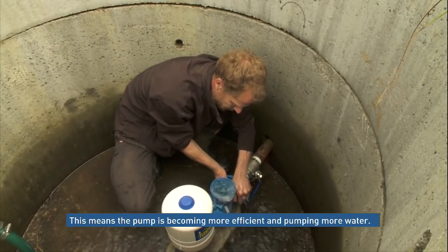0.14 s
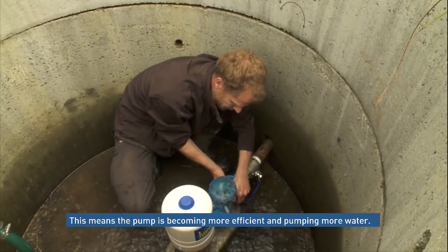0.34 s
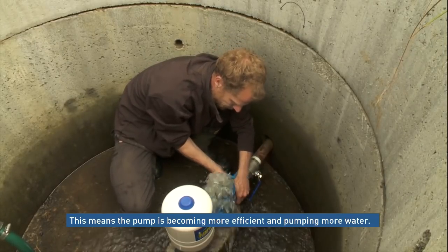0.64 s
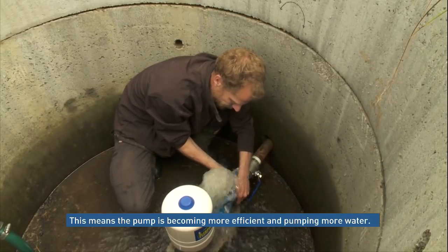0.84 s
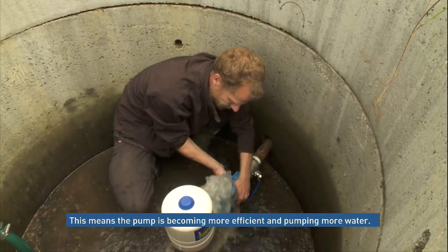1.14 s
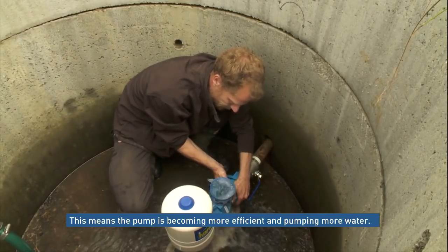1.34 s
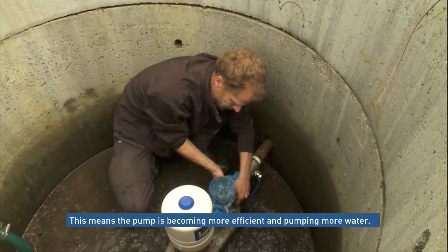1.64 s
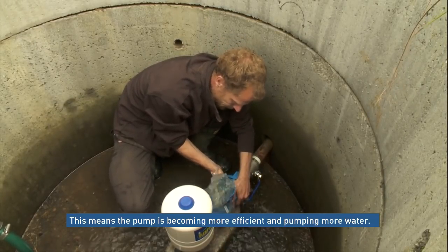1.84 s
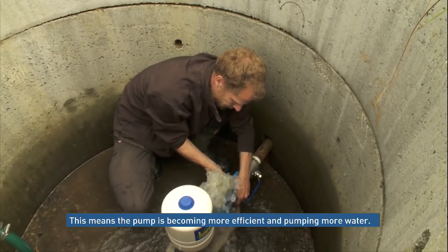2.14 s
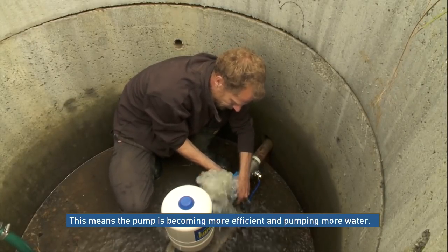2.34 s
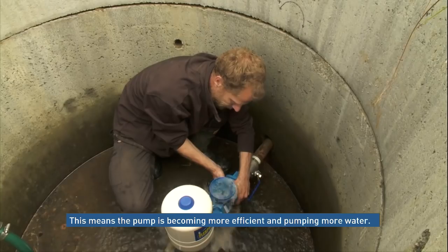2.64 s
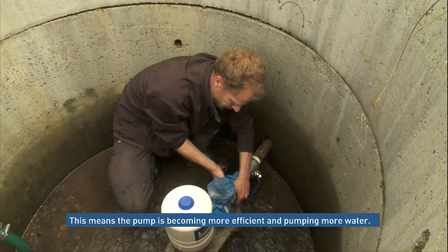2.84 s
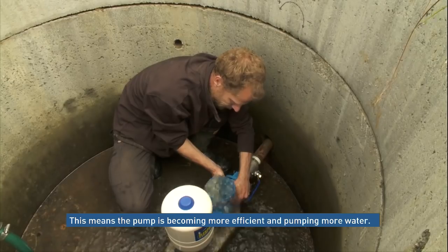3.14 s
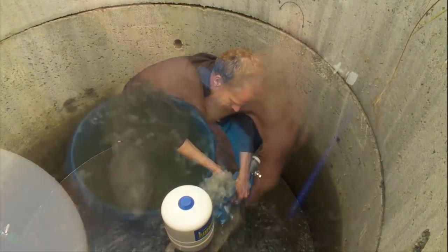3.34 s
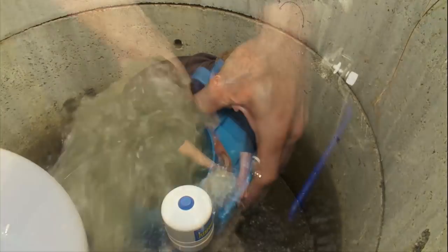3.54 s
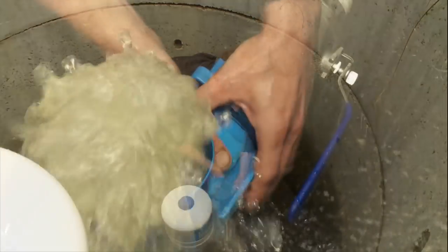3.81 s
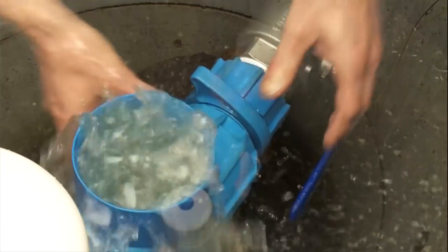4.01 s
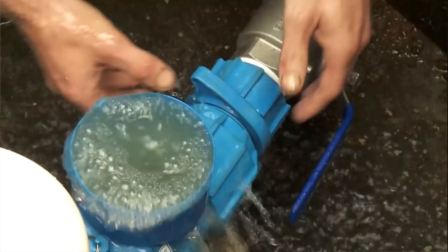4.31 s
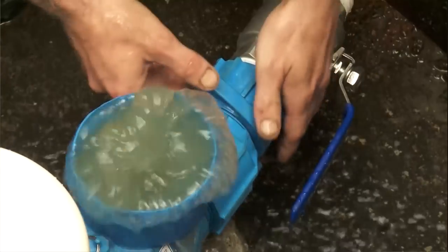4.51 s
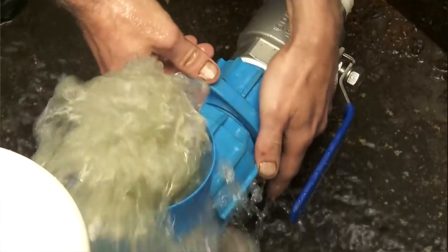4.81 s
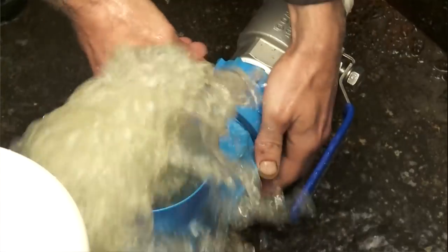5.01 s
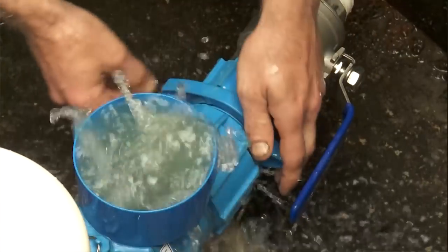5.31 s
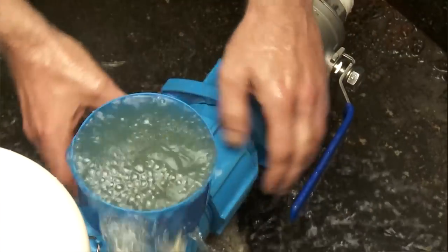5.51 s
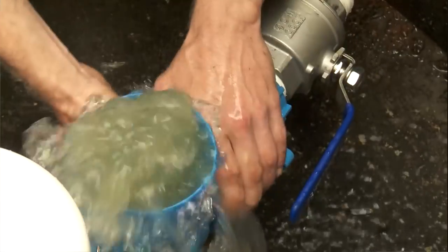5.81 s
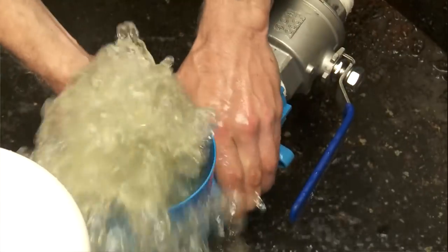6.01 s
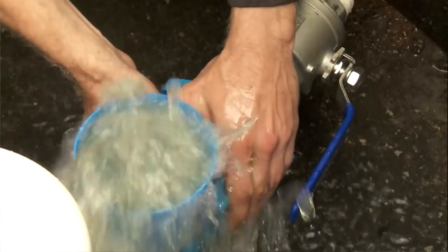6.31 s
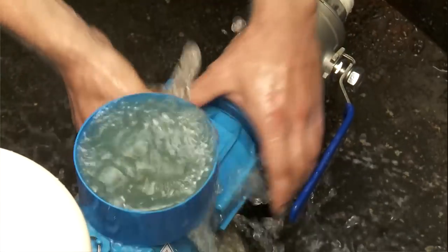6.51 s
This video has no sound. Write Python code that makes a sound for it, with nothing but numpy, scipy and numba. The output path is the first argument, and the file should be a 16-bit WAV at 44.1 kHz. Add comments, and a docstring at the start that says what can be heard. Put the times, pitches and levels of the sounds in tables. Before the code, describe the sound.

Close in a round concrete pit, a water pump beats every 1.3 seconds. Water gushes from its valve, swelling until the valve slams with a hard, hollow knock and short metallic ring. The flow stops abruptly; thrown water splashes back on the wet floor, glugs and drains to drips before the next gush. Single bubbles plop throughout, with a faint hiss beneath.

```python
"""Hydraulic ram pump in a pit

A hydraulic ram pump beats at the bottom of a round concrete pit, once every 1.3 s. Water, built from
clouds of ringing bubbles and filtered noise, gushes ever harder from the waste valve until it slams shut
with a knock: a pressure pulse, its echoes and ringing modes. The thrown water falls back on the wet floor,
gurgles and drains. A low rumble of filtered noise comes and goes for a while; a faint hiss lies under all."""
import sys
import numpy as np
from scipy import signal
from scipy.fft import rfft, irfft, next_fast_len
from scipy.io import wavfile
from numba import njit

SR = 44100
rng = np.random.default_rng(int(sys.argv[2]) if len(sys.argv) > 2 else 0)


def generate_wav(sig):
    """Save sig (samples, or channels by samples) to the path in sys.argv[1] as 16-bit PCM at SR."""
    pcm = np.round(np.clip(np.atleast_2d(sig).T, -1, 1) * 32767).astype(np.int16)
    wavfile.write(sys.argv[1], SR, pcm)


N = 293302
TIME = np.arange(N) / SR   # seconds

# The valve slams. Each row: time in seconds, thud level in dB, relative crack level in dB.
KNOCKS = [(1.1510, -7.5, -22), (2.4596, -4.5, -21.5), (3.7695, -6, -22.5), (5.0744, -6.5, -20.5),
          (6.3786, -6, -22.5)]
# Large single bubbles. Each row: time in seconds, height before the envelope in dB, nominal pitch in Hz,
# ring in cycles.
PLOPS = [(0.052, -17.5, 454, 12), (0.178, -19, 730, 31), (0.354, -18, 1260, 38), (0.808, -14.5, 806, 30),
         (0.81, -15, 1030, 27), (0.845, -17, 659, 41), (0.932, -22, 514, 38), (1.216, -19, 1170, 49),
         (1.430, -20, 484, 26), (1.681, -13, 1620, 47), (2.046, -24.5, 677, 13), (2.275, -16.5, 641, 34),
         (2.801, -12.5, 767, 23), (3.375, -22.5, 830, 23), (3.415, -21, 810, 58), (3.485, -20, 520, 25),
         (3.557, -10.5, 1240, 22), (3.558, -16, 567, 27), (3.836, -19, 1030, 33), (4.012, -24.5, 514, 32),
         (4.457, -33, 2000, 36), (4.655, -21.5, 877, 40), (4.678, -17.5, 1274, 25), (4.731, -21, 1726, 47),
         (4.93, -11.5, 1760, 55), (5.21, -18.5, 392, 37), (5.540, -12.5, 785, 35), (5.593, -20, 1670, 40),
         (5.719, -23, 1500, 50), (5.882, -26, 1930, 41), (6.079, -17, 1067, 75), (6.122, -9, 737, 42),
         (6.168, -10, 1680, 30), (6.488, -21.5, 407, 20)]
# Lumps of water slap down. Each row: time in seconds, rms level at the top in dB, centre in Hz,
# width in octaves, fall time in seconds.
SLAPS = [(0.124, -24, 1480, 1.3, 0.01), (0.240, -25, 4200, 1.6, 0.031), (0.281, -28, 4520, 2.5, .011),
         (0.41, -25, 6300, 2.1, 0.01), (0.445, -30.5, 2960, 0.78, 0.0062), (0.518, -38, 3000, 3.6, 0.015),
         (0.688, -34.5, 1840, 0.64, 0.024), (0.886, -18, 2500, 0.7, 0.0092),
         (1.134, -22, 2500, 1.5, 0.0082), (1.465, -24, 3280, 3, 0.01), (1.660, -26.5, 4200, 1.8, 0.0089),
         (1.6814, -26.5, 2320, 0.97, 0.0091), (1.967, -36, 3420, 2.8, 0.023),
         (2.121, -28.5, 2460, 0.46, 0.01), (2.250, -27.5, 5800, 2.1, 0.011), (2.288, -24, 5000, 1, .01),
         (2.41, -25, 1390, 0.45, 0.0054), (2.745, -28.5, 2680, 2.1, 0.04), (2.824, -25, 3080, 3.3, 0.016),
         (3.02, -30, 4440, 2.5, 0.012), (3.069, -36, 1660, 1.8, 0.012), (3.165, -37, 4500, 2.1, 0.016),
         (3.268, -43, 3500, 2.4, 0.035), (3.308, -32.5, 2500, 0.32, 0.0051),
         (3.585, -25, 2460, 0.58, 0.0096), (3.693, -21, 2340, 1.4, 0.011), (3.947, -25.5, 2150, 3.5, 0.011),
         (4.047, -25, 2190, 3, 0.013), (4.0997, -24.5, 3300, 2.7, 0.0095), (4.139, -28, 1520, 0.7, 0.0093),
         (5.052, -18.5, 2550, 2.6, .011), (5.387, -25, 2420, 1.05, 0.011), (5.632, -39, 3780, 3.2, 0.035),
         (5.827, -35, 3500, 2.4, 0.0091), (5.996, -32.5, 4500, 2, .012), (6.079, -28.5, 1990, 0.73, 0.01),
         (6.17, -20.5, 2160, 0.53, 0.0095), (6.251, -25, 4470, 1.9, 0.017),
         (6.344, -23.5, 1730, 1.1, 0.0097), (6.538, -24, 3070, 2, 0.027)]
# Single hard drops tick on the pump body. Each row: time in seconds, rms level at the top in dB.
TICKS = [(0.295, -24), (0.811, -19.5), (1.431, -20.5), (1.600, -28), (1.683, -21), (2.994, -25),
         (3.453, -23), (4.39, -29), (4.78, -19.5), (4.980, -21)]
# Colour of the water. Each row: frequency in Hz, relative spectral level in dB.
WATER_COLOUR = [(120, -46), (200, -18), (340, -22), (490, 3), (537, -14.5), (732, -0.5), (912, -4.5),
                (1470, 0), (2450, -1), (3730, -11), (6110, -8.5), (7470, -12.5), (9300, -12),
                (15000, -23.5), (15800, -17)]
# Wall and floor throw the knock back. Each row: delay in seconds, signed gain.
ECHOES = [(.0038, -.68), (.0051, .62), (.0076, -.4), (.0095, -.2), (.0119, -.36), (.0162, -.25),
          (.0188, -.2), (.0258, -.21)]
# Air modes of the pit. Each row: frequency in Hz, relative level in dB, 60 dB decay in seconds.
PIT_MODES = [(137, -42, 0.6), (183, -26, 0.11), (213, -28, 0.21), (281, -28.5, 0.2), (308, -28.5, 0.27),
             (355, -25, 0.11), (383, -27.5, 0.32), (448, -23, 0.28), (610, -22, 0.068), (702, -31, 0.19)]
# Ring of the valve body. Each row: frequency in Hz, relative level in dB, 60 dB decay in seconds.
VALVE_MODES = [(883, -11, 0.038), (1320, -2, 0.029), (1970, 3, 0.036)]
# Diffuse reverberation of the pit. Each row: frequency in Hz, 60 dB decay in seconds.
PIT_DECAY = [(150, 0.59), (400, 0.16), (1000, 0.21), (4000, 0.089), (14000, 0.045)]
# Colour of the rumble. Each row: frequency in Hz, relative spectral level in dB.
RUMBLE_COLOUR = [(12, -37), (20, -5), (59, -1.5), (124, -0.5), (300, -0.5), (390, -30), (660, -120)]
# The rumble swells. Each row: time in seconds, level in dB, half length in seconds.
RUMBLE_SWELLS = [(1.43, -44, 0.073), (1.98, -43.5, 0.11), (2.215, -37, 0.094), (2.415, -38.5, 0.04),
                 (3.44, -41.5, 0.056), (3.62, -43.5, 0.1)]
# The valve drops open before each knock. Each row: time in seconds, then relative levels in dB of the
# gush, of the thrown water and of the trickle at that moment.
GUSHES = [(0.54, 3.5, -1.5, 3.4), (1.939, 2, -1.8, 0), (3.206, 0.6, -1.7, -1.3), (4.486, -0.4, 0.5, -4.5),
          (5.84, 1.66, 0.9, 0.9)]
# The water's voices. Each row: full gush in dB, power of the flow it follows, change as the gap closes
# in dB, landing in dB, overflow in dB, trickle in dB.
GURGLE = (-34.5, 3, -0.5, -41.5, -54.5, -56)
SPLASH = (-27.5, 4, -1.5, -35, -38, -48.5)
SPRAY = (-26.5, 3.5, 0, -31.5, -33, -46.5)
CHURN = (-44.5, 2.5, 4, -53.5, -81, -64.5)

EARLIER_KNOCK_S, EARLIER_THROW_DB = -0.18, 1   # water from the stroke before is still in the air
FLOW_RISE_S, SHUT_S = 0.19, 0.0047   # the column in the drive pipe gathers speed; the valve cuts it off
CLOSING_S = 0.19   # time before the slam over which the closing gap changes the voices
LANDING_S, LANDING_SPREAD_S = 0.28, 0.12   # flight time of the thrown water
OVERFLOW_S, OVERFLOW_SAG_DB_PER_S, DRAIN_DB_PER_S = 0.54, 7, 75   # the cup runs over, then the floor drains
SURGE_DB, SURGES_PER_S = 0.24, 18   # the water comes in uneven lumps
LULL_DB, LULL_FLUTTER_DB = -34, 2.2   # below this spray level the stream thins and flutters
GURGLE_WASH_DB, SPLASH_WASH_DB, SPRAY_WASH_DB = -8, 2.5, 1.5   # smooth noise under each voice's bubbles
GURGLE_CLUMP_DB, GURGLE_CLUMPS_PER_S = 2.6, 38
DRIP_SPRAY_DB = -35.5   # spray level at which the drip and spatter settings hold
DRIP_DB, DRIPS_PER_S = -39.5, 190
SPATTER_DB, SPATTERS_PER_S = -40, 45   # level of the faintest
DRIP_FOLLOWS = 0.6   # share of the spray's swing
HISS_DB = -63
TICK_FALL_S = 0.0025
PLOP_RISE = 0.19   # pitch rise as a share of the starting pitch
SLAP_RISE_SHARE = 0.36   # rise time as a share of the fall time
GLUG_FIRST_HZ, GLUG_LAST_HZ, GLUG_SINK_S = 934, 485, 0.437
GLUG_DB, GLUG_LOUDEST_S, GLUG_SPREAD_S = -42, 0.3, 0.19   # timed from the opening of the valve
MODE_SPREAD_DB, BOOM_FLUTTER_DB = 1.5, 2.6
RECOIL_S, RECOIL_LOSS_DB = 0.0606, 10.5   # round trip in the drive pipe; loss on each further trip
RUMBLE_FROM_S, RUMBLE_UNTIL_S = 1.4, 3.77
RUMBLE_DB, RUMBLE_REST_DB, RUMBLE_LUMPS_DB = -52, -69.5, 2.3   # while it lasts; always; unevenness
SLOSH_S = 0.003   # mean delay of the changing path
PEAK_CEILING, CUTOFF_HZ = 0.8, 15850


def from_db(db):
    """Decibels to amplitude gain: twenty decibels are a factor of ten."""
    return 10 ** (np.asarray(db) / 20)


def rms_one(x):
    """Normalisation of the mean power to one."""
    return x / np.sqrt(np.mean(x ** 2) + 1e-20)


def at_hz(points, hz):
    """Interpolation on a logarithmic frequency axis."""
    log_hz = np.log(np.array(points)[:, 0])
    return np.interp(np.log(np.maximum(hz, 1)), log_hz, np.array(points)[:, 1])


def colour(x, spectrum):
    """Linear filtering: multiply the spectrum of a steady sound by a gain curve."""
    half = next_fast_len(N)
    gain = from_db(at_hz(spectrum, np.linspace(0, SR / 2, half + 1)))
    return irfft(rfft(x, 2 * half) * gain)[:N]


def band(x, low_hz, high_hz, order=2):
    """Band-pass filtering with a maximally flat (Butterworth) response."""
    edges = [low_hz, min(high_hz, SR / 2 - 1000)]
    return signal.sosfilt(signal.butter(order, edges, "band", fs=SR, output="sos"), x + 1e-18)


def noise(length=N):
    """White noise: equal power at all frequencies, rms about 1."""
    return rng.standard_normal(length)


def drift(rate):
    """Slow random modulation: straight lines between random values, rate a second; rms 1."""
    return rms_one(np.interp(TIME * rate, np.arange(8192), noise(8192)))


def gaussian(t, width):
    """Gaussian hump around zero, top 1."""
    return np.exp(-(t / width) ** 2)


def clicks(times, levels_db):
    """Impulse excitation: one sample for each event."""
    out = np.zeros(N)
    samples = np.clip(np.round(np.asarray(times) * SR).astype(int), 0, N - 1)
    np.add.at(out, samples, from_db(levels_db))
    return out


def through(x, response):
    """Convolution with an impulse response, keeping the length."""
    return signal.oaconvolve(x, response)[:N]


def ringing(modes):
    """Modal superposition: an impulse response of exponentially damped sines."""
    t = TIME[:SR]
    return sum(from_db(db - 60 * t / t60) * np.sin(2 * np.pi * hz * t) for hz, db, t60 in modes)


def burst(rise_s, fall_s):
    """Transient envelope: a quick build-up and an exponential decay, top 1."""
    t = TIME[:SR // 2]
    shape = (1 - np.exp(-t / rise_s)) ** 2 * np.exp(-t / fall_s)
    return shape / shape.max()


@njit
def ring_bubbles(starts, hz, heights, cycles, glide, swell):
    """Damped bubble resonance: each decays by 40 dB over its cycles and rises in pitch near the surface."""
    out = np.zeros(N)
    for k in range(len(starts)):
        length = int(cycles[k] / hz[k] * SR)
        for i in range(min(length, N - starts[k])):
            age = i / length
            shape = age ** 2 / (age ** 2 + swell ** 2) * np.exp(-np.log(100) * age)
            phase = 2 * np.pi * cycles[k] * (age + glide[k] * age ** 2 / 2)
            out[starts[k] + i] += heights[k] * shape * np.sin(phase)
    return out


def bubble_cloud(low_hz, high_hz, per_s, cycles, spread_db, glide=0.283, swell=0.042, tuning=1):
    """Random superposition of bubbles, each with its own pitch, size and life; tuning moves the range; rms 1."""
    birth, pitch, size, life, rise = rng.random((5, N))
    starts = np.flatnonzero(birth < per_s / SR)
    hz = low_hz * (high_hz / low_hz) ** pitch[starts] * np.broadcast_to(tuning, N)[starts]
    heights = hz * from_db(spread_db * np.minimum(-np.log(size[starts]), 3))
    lives = cycles * (0.5 + life[starts])
    return rms_one(ring_bubbles(starts, hz, heights, lives, 2 * glide * rise[starts], swell))


def water_level(voice):
    """Superposed powers, in dB: the gush grows until the slam, thrown water lands, runs over and drains."""
    gush_db, flow_power, closing_db, landing_db, overflow_db, trickle_db = voice
    opens, strength_db, thrown_db, wetness_db = np.transpose(GUSHES)
    slams = np.array(KNOCKS)[:, 0]
    t = TIME[::40]   # levels change slowly
    power = from_db(trickle_db + np.interp(t, opens, wetness_db)) ** 2
    for start, slam, db in zip(opens, slams, strength_db):
        flow = 1 - np.exp(-np.maximum(t - start, 0) / FLOW_RISE_S)
        gap = np.exp(-np.maximum(t - slam, 0) / SHUT_S)
        narrowing_db = closing_db * gaussian(t - slam, CLOSING_S)
        power += (from_db(gush_db + db + narrowing_db) * flow ** flow_power * gap) ** 2
    for slam, db in zip([EARLIER_KNOCK_S, *slams], [EARLIER_THROW_DB, *thrown_db]):
        since = np.maximum(t - slam, 0)
        landing = from_db(landing_db + db) * gaussian(since - LANDING_S, LANDING_SPREAD_S)
        drained_db = OVERFLOW_SAG_DB_PER_S * since + DRAIN_DB_PER_S * np.maximum(since - OVERFLOW_S, 0)
        overflow = from_db(overflow_db + db - drained_db)
        power += (t > slam) * (landing ** 2 + overflow ** 2)
    return np.interp(TIME, t, 10 * np.log10(power))


def water_band(grains, low_hz, high_hz, wash_db, flutter, own_db=2.5):
    """Noise-like limit of many bubbles: grains on a smooth wash, in three parts that flutter apart; rms 1."""
    rest = band(colour(grains + from_db(wash_db) * noise(), WATER_COLOUR), low_hz, high_hz, order=4)
    out = 0
    for split_hz in np.geomspace(low_hz, high_hz, 4)[1:3]:
        lower = signal.sosfiltfilt(signal.butter(2, split_hz, fs=SR, output="sos"), rest)
        out = out + lower * from_db(own_db * drift(90))
        rest = rest - lower
    out = out + rest * from_db(own_db * drift(90))
    return rms_one(out * from_db(flutter))


def water():
    """Bubble resonance by size: big ones gurgle, small ones splash, droplets crackle; the stream tears."""
    thin = np.clip((LULL_DB - water_level(SPRAY)) / 10, 0, 1)   # a thin stream breaks up into dribbles
    lull_db = LULL_FLUTTER_DB * thin / 2
    surge_db = (SURGE_DB + lull_db) * drift(SURGES_PER_S) + lull_db * drift(55)
    gurgle_db, splash_db, spray_db = (water_level(voice) + surge_db for voice in (GURGLE, SPLASH, SPRAY))
    tearing = 0.66 * drift(70) + 0.32 * drift(300)   # dB

    big = bubble_cloud(503.0, 1050, per_s=220, cycles=26.0, spread_db=1.5)
    small = bubble_cloud(924, 3597, per_s=1100, cycles=20.1, spread_db=3.0)
    droplets = bubble_cloud(3270, 15600, per_s=2600, cycles=11.2, spread_db=-0.5)
    gurgle = water_band(big, 566, 1063, GURGLE_WASH_DB, tearing)
    splash = water_band(small, 867, 5100, SPLASH_WASH_DB, tearing)
    spray = water_band(droplets, 3040, 15000, SPRAY_WASH_DB, tearing)
    clumps_db = GURGLE_CLUMP_DB * drift(GURGLE_CLUMPS_PER_S)   # big bubbles come in bunches
    stream = from_db(gurgle_db + clumps_db) * gurgle + from_db(splash_db) * splash + from_db(spray_db) * spray

    # only a strong gush traps the largest pockets of air and shakes the pit
    largest = bubble_cloud(350.0, 514, per_s=200, cycles=33.6, spread_db=4.0)
    churn = from_db(water_level(CHURN) + surge_db) * rms_one(band(largest, 413, 750))
    shake = from_db(0.5 * (gurgle_db + splash_db) - 18.5) * rms_one(band(noise(), 117, 680))
    # lone bubbles on the wet floor depend less on the flow, so they stand out in the lulls
    lone = band(bubble_cloud(774, 3115, per_s=60, cycles=33.0, spread_db=0, glide=0.243), 580, 1560, order=1)
    return stream + churn + shake + from_db(-22.0 + 0.5 * splash_db) * lone


def drips():
    """Impact and bubble resonance: droplets tick and tinkle on the wet floor, still heard in the lulls."""
    level_db = DRIP_DB + DRIP_FOLLOWS * (water_level(SPRAY) - DRIP_SPRAY_DB)
    tinkle = bubble_cloud(1429, 5030, per_s=DRIPS_PER_S / 3, cycles=34, spread_db=3.5)
    ticks = bubble_cloud(3020, 12000, per_s=DRIPS_PER_S, cycles=6.2, spread_db=-2.0)
    tinkle = band(tinkle, 1430, 2840, order=1)
    ticks = band(ticks, 3000, 10900, order=1)
    return from_db(level_db) * (tinkle + from_db(-3.5) * ticks)


def falling_water(fall_s=0.073, hum_s=0.24, ragged_db=3.5):
    """Modal excitation by impact: ragged lumps land, glug and stir the pit's modes, the lowest one last."""
    s = np.array(KNOCKS)[:, 0]
    since = (TIME - s[0]) % np.mean(np.diff(s))   # seconds since the last beat
    landing = gaussian(since - fall_s, 0.18) * from_db(ragged_db * drift(45))
    swelling = from_db(-49.5) * gaussian(since - hum_s, 0.11) + from_db(-73)
    hollow = rms_one(through(noise(), ringing([(382, 7.5, 0.23), (500, 8.3, 0.28)])))
    hum = rms_one(band(through(noise(), ringing([(139, 0, 0.5)])), 115, 175))
    glugs = bubble_cloud(293, 710, per_s=150, cycles=20, spread_db=0.5, glide=0.12)
    patter = rms_one(band(noise(), 182, 420))
    lumps = landing * (from_db(-42.0) * hollow + from_db(-44.0) * glugs + from_db(-50) * patter)
    return lumps + from_db(-59) * patter + swelling * hum


def hiss():
    """Stationary band-limited noise: a faint, steady high hiss under everything."""
    return from_db(HISS_DB) * rms_one(band(noise(), 10500, 16000))


def spatter():
    """Impact noise: flung drops smack pump and floor, a few hard ones and many small ones with the spray."""
    chance, size = rng.random((2, N))
    hits = np.flatnonzero(chance < SPATTERS_PER_S / SR)
    swing_db = DRIP_FOLLOWS * (water_level(SPRAY)[hits] - DRIP_SPRAY_DB)
    small_db = SPATTER_DB + swing_db + 10 * size[hits]
    smack = burst(TICK_FALL_S / 20, TICK_FALL_S)
    small = through(clicks(hits / SR, small_db), smack) * rms_one(band(noise(), 1180, 3800))
    hard = through(clicks(*np.transpose(TICKS)), smack) * rms_one(band(noise(), 1650, 6400, order=1))
    return small + hard


def plops(lead_s=0.00211, shed_db=-9):
    """Resonance of single large bubbles; each sheds two smaller ones of nearby pitch as it tears loose."""
    s, db, hz, cycles = np.transpose(PLOPS)
    rise = np.full(len(s), PLOP_RISE)
    starts = ((s - lead_s) * SR).astype(np.int64)
    out = ring_bubbles(starts, hz * (1 - PLOP_RISE / 6), from_db(db), cycles, rise, 0.093)
    for late, detune in rng.uniform(-1, 1, (len(s), 2, 2)).T:
        starts = ((s + 0.01 * late) * SR).astype(np.int64)
        out = out + ring_bubbles(starts, hz * 1.25 ** detune, from_db(db + shed_db), cycles / 2, rise, 0.1)
    return out


def slaps(lead_s=0.003, grain_db=3):
    """Band-limited impact noise: small droplets hiss high and wide, hollow lumps ring narrow."""
    out = np.zeros(N + SR)
    for s, db, hz, octaves, fall_s in SLAPS:
        shape = burst(SLAP_RISE_SHARE * fall_s, fall_s)
        start = int((s - lead_s) * SR)
        drops = noise(len(shape)) * from_db(grain_db * noise(len(shape)))
        half_width = 2 ** (octaves / 2)
        drops = rms_one(band(drops, hz / half_width, hz * half_width))
        out[start:start + len(shape)] += from_db(db) * shape * drops
    return out[:N]


def glugging(spread=1.264):
    """Larger bubbles ring lower: air pockets boil up, growing as the cup fills, so the glugging sinks."""
    opens = np.array(GUSHES)[:, 0]
    last_open = opens[np.maximum(np.searchsorted(opens, TIME) - 1, 0)]
    since = np.maximum(TIME - last_open, 0)
    tuning = (GLUG_LAST_HZ / GLUG_FIRST_HZ) ** np.minimum(since / GLUG_SINK_S, 1)
    pockets = bubble_cloud(GLUG_FIRST_HZ / spread, GLUG_FIRST_HZ * spread, per_s=380, cycles=18,
                           spread_db=1, glide=0.1, tuning=tuning)
    level = from_db(GLUG_DB) * gaussian(since - GLUG_LOUDEST_S, GLUG_SPREAD_S)
    return level * rms_one(pockets / tuning)   # undo the weakening of low bubbles


def knocks(pulse_hz=530, crack_delay_s=0.0028, bounce_s=0.014):
    """Water hammer: one smooth pressure pulse, its echoes and the pit's modes; the valve bounces and rings."""
    s, thud_db, crack_db = np.transpose(KNOCKS)
    phase = np.pi * pulse_hz * (np.arange(257) - 128) / SR
    pulse = (2 * phase ** 2 - 1) * np.exp(-phase ** 2)
    echoes = sum(gain * clicks(s + delay, thud_db) for delay, gain in ECHOES)
    thud = signal.oaconvolve(clicks(s, thud_db) + echoes, pulse, "same")

    boom = 0
    for mode in PIT_MODES:   # every slam stirs each mode a little differently
        stir_db = thud_db + 4.0 + rng.normal(0, MODE_SPREAD_DB, len(s))
        boom = boom + through(clicks(s, stir_db), ringing([mode]))
    # the thrashing water breaks up the boom
    boom = band(boom, 162, 2700) * from_db(BOOM_FLUTTER_DB * drift(65))

    crack_noise = rms_one(colour(band(noise(), 900, 15400), WATER_COLOUR))
    crack = through(clicks(s + crack_delay_s, crack_db + 6.0), burst(0.00031, 0.008)) * crack_noise
    blows = clicks(s + crack_delay_s, crack_db + 2) + clicks(s + bounce_s, crack_db - 0.5)
    valve = through(blows, ringing(VALVE_MODES))
    # the jolted water thumps
    thump_level = through(clicks(s + crack_delay_s, thud_db - 17.0), burst(0.0016, 0.0065))
    thump = thump_level * rms_one(band(noise(), 256, 1100))
    return thud + thump + boom + crack + valve


def recoil():
    """Reflection in a pipe: the pressure wave runs up and back, shaking the valve's water ever more weakly."""
    s, thud_db, _ = np.transpose(KNOCKS)
    jolts = sum(clicks(s + trip * RECOIL_S, thud_db - (trip - 1) * RECOIL_LOSS_DB) for trip in range(1, 4))
    bubbles = bubble_cloud(270, 520, per_s=900, cycles=12, spread_db=1.5)
    glug = from_db(-23) * through(jolts, burst(0.003, 0.016)) * bubbles
    splash = from_db(-23.5) * through(jolts, burst(0.0014, 0.014)) * rms_one(band(noise(), 440, 1140))
    return glug + splash


def rumble():
    """Low-passed noise under a power envelope: faint at first, it lasts about two strokes and swells."""
    lasting = np.clip(np.minimum(TIME - RUMBLE_FROM_S, RUMBLE_UNTIL_S - TIME) / 0.037, 0, 1)
    swells = sum((from_db(db) * gaussian(TIME - s, width)) ** 2 for s, db, width in RUMBLE_SWELLS)
    level = np.sqrt(from_db(RUMBLE_REST_DB) ** 2 + (from_db(RUMBLE_DB) * lasting) ** 2 + swells)
    lumps = from_db(RUMBLE_LUMPS_DB * drift(29.73))
    return level * lumps * rms_one(band(colour(noise(), RUMBLE_COLOUR), 32, 154))


def sloshing(x, rate=9):
    """Varying propagation delay: the water thrashes about, so its path to the wall keeps changing."""
    return np.interp(TIME - SLOSH_S * (1 + 0.5 * drift(rate)), TIME, x)


def pit_tail(x):
    """Diffuse reverberation: noise decaying exponentially, octave by octave, longest in the bass."""
    t, response = TIME[:SR], 0
    for hz in 125 * 2. ** np.arange(8):
        fade = np.exp(-np.log(1000) * t / at_hz(PIT_DECAY, hz)) * (1 - np.exp(-t / 0.0011))
        octave = band(noise(SR), hz / np.sqrt(2), hz * np.sqrt(2))
        response = response + octave * fade / np.linalg.norm(fade)
    return through(x, response)


def scene():
    """Superposition of the direct sounds of pump and water, the pit's reverberation and a steady hiss."""
    wet = water() + glugging() + drips()
    pops = plops() + slaps() + spatter()
    hammer = knocks() + recoil()
    tail = pit_tail(sloshing(from_db(-5.5) * wet + from_db(-13.0) * pops) + from_db(-12.5) * hammer)
    return (wet + pops + hammer + tail + falling_water() + hiss() + rumble())[None]


def record(dry):
    """Saturation and low-pass filtering: the highest peaks are rounded off, the top is cut steeply."""
    rounded = dry / (1 + (dry / PEAK_CEILING) ** 4) ** 0.25
    return signal.sosfilt(signal.ellip(12, 0.1, 80, CUTOFF_HZ, fs=SR, output="sos"), rounded)


dry = scene()
out = record(dry)
generate_wav(out)
```